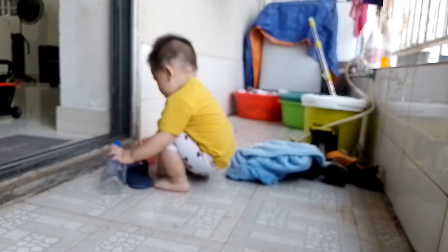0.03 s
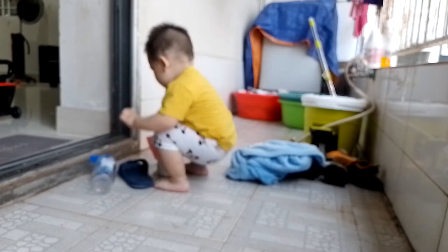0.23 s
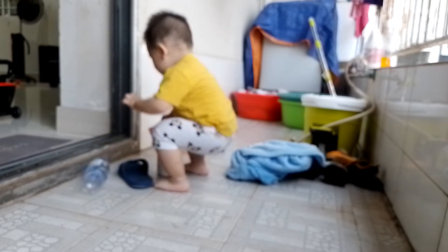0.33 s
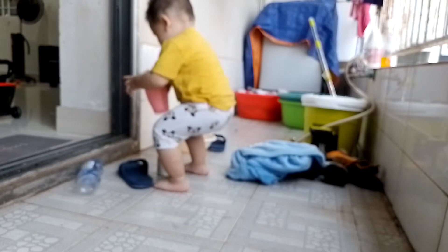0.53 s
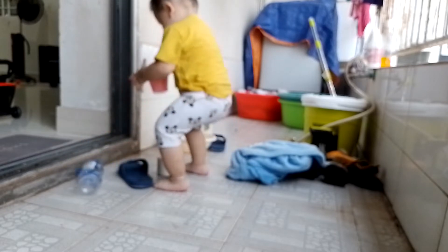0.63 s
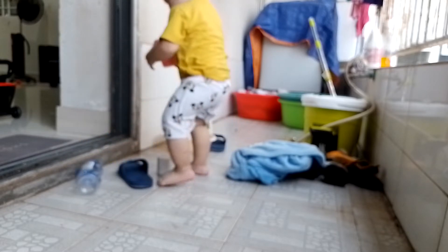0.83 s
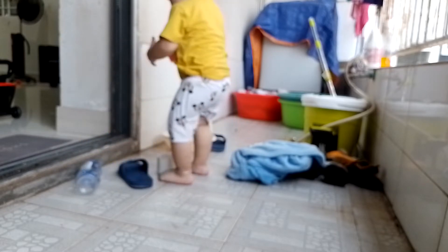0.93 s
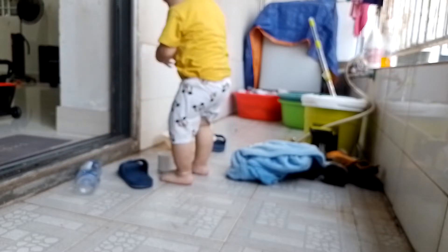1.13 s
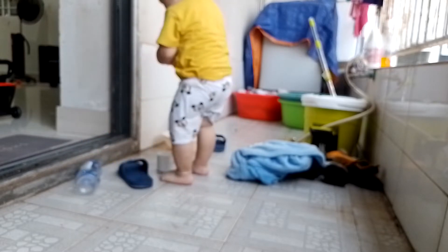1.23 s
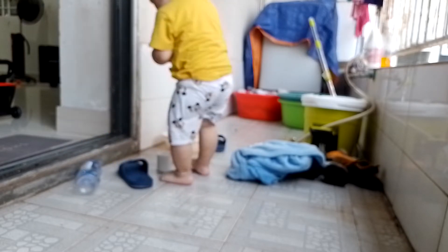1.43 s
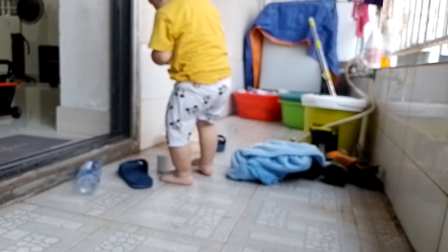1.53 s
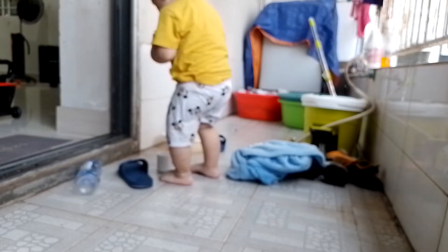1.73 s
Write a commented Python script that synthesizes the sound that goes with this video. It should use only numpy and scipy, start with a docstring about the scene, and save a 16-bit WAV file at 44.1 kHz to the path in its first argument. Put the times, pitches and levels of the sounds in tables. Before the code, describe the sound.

An empty thin plastic bottle topples onto balcony tiles, bouncing in a fast run of bright crackling knocks with a hollow ring, then rolls, scuffs softly and stops; close stereo pickup, faint outdoor noise beneath.

```python
"""Empty bottle on a tiled balcony

A plastic bottle topples, bounces from end to end, rattles and rolls to rest between hard walls.
Each contact is a click, snaps, noise and ringing shell modes; a sine is the hollow note of the air inside.
Filtered noise makes the low rumble, the roll and the scuffs; gliding and dying sines, the squeal and last knocks.
Faint distant outdoor noise lies underneath; two microphone ports each add their own treble resonance."""
import sys
import numpy as np
from scipy import signal
from scipy.fft import rfft, irfft
from scipy.io import wavfile
from scipy.ndimage import uniform_filter1d

SR = 44100
rng = np.random.default_rng(int(sys.argv[2]) if len(sys.argv) > 2 else 0)


def store_wav(level_fs):
    """Save 16-bit WAV to argv[1]."""
    pcm = np.round(np.clip(np.atleast_2d(level_fs), -1, 1) * 32767)
    wavfile.write(sys.argv[1], SR, pcm.T.astype(np.int16))


N = 79380

# steady noise from beyond the balcony, relative spectrum: (frequency [Hz], density [dB per Hz])
OUTDOOR_SPECTRUM = [(15, -29), (28, -8), (80, -4), (125, -14), (160, -22.5), (230, -7.5), (360, -1.5),
                    (440, -2), (490, 8), (580, -5.5), (870, -4), (1250, -13), (2000, -11.5), (4500, -20),
                    (9000, -22), (14000, -17.5)]
# likeness of the two channels in that noise: (frequency [Hz], likeness [0-1])
OUTDOOR_LIKENESS = [(60, 1), (290, .76), (640, 0.2), (1400, 0)]
# contacts with the tiles: (time [s], crack level [dB], brightness [dB per octave], lingering ring [dB],
# shell modes [dB], hollow note [dB])
CONTACTS = [(0.2034, -6.5, 0, -4, 5, -35.5), (0.2720, -4, 0.4, -6, 3, -33.5),
            (0.3320, -0.5, 0.5, -8, 6.5, -23), (0.3403, 7, 3.5, -6.5, 1, -67),
            (0.3466, -14.5, -2.5, -14, -11, -39), (0.4265, 4, 1.6, -3.5, 0, -37),
            (0.4390, 4, -1.5, -3.5, -5, -29), (0.5100, 2.5, -1, -0.5, -8, -30.5),
            (0.5680, -5.5, -2, -8.5, 1, -34), (0.6056, -4.5, -1.5, -9.5, -6.5, -32),
            (0.663, -9.5, -1.5, -12, -1, -35), (0.6792, -13.5, -3, -4.5, -10, -29.5),
            (0.6950, -10.5, -1.5, -7, 2, -43.5), (0.7343, -18, -3, -34, -1, -35.5),
            (0.7505, -14.5, -3, -33, -5, -41.5), (0.77, -22.5, -3, -32, 14.5, -47),
            (0.7903, -22, -4, -37, -7, -77)]
# colour of every contact: (frequency [Hz], gain [dB])
SHELL_SPECTRUM = [(30, -56), (70, -36.5), (160, -39), (290, -5), (420, 1.5), (620, -12.5), (1000, -13.5),
                  (1550, -8.5), (1900, -7), (2400, -6.5), (4000, -7), (5500, -3), (9000, -4), (14000, -4.5)]
# ringing modes of the thin shell: (nominal frequency [Hz], level [dB], t60 [s])
SHELL_MODES = [(792, -44.5, 0.084), (1182, -44.5, .15), (1465, -43, 0.24), (1604, -34.5, 0.15),
               (2289, -37.5, .12), (3080, -35, 0.17), (3470, -38.5, .14), (5290, -47, .12),
               (6690, -35.5, 0.063), (7650, -58.5, 0.13)]
# lingering sound of the balcony: (frequency [Hz], gain [dB], t60 [s])
BALCONY_TAIL = [(80, 19, 2.1), (170, 11.5, 1.7), (354, 5, 0.61), (694, 3.5, 1), (1474, 2, 0.67),
                (3000, 4, 0.62), (7000, -5, 0.79), (11180, -7.5, 0.88), (14000, -22.5, 0.33)]
# stereo width of the bounces: (frequency [Hz], gain of the side signal [dB])
BOUNCE_WIDTH = [(100, -9.5), (300, -9.5), (600, -0.5), (1200, 2), (5000, -0.5)]
# low rumble while the bottle tumbles: (time [s], level [dB])
RUMBLE_LEVEL = [(0.38, -97), (0.45, -69.5), (0.62, -68), (0.8, -71.5), (0.95, -79), (1.1, -96)]
# faint scuffs on the tiles: (time [s], length [s], level [dB])
SCUFF_EVENTS = [(0.873, 0.13, -60), (0.95, .17, -62.5)]
# soft last knocks as the bottle settles: (time [s], level [dB])
LAST_KNOCKS = [(0.896, -53), (1.025, -54)]
# response of the left microphone port: (frequency [Hz], gain [dB])
LEFT_PORT_RESPONSE = [(100, 4), (400, 2), (1100, 0.5), (2500, 1.5), (5800, 4.5), (6800, 9), (7350, 17),
                      (8000, 10.5), (8600, 3), (9500, 0), (10500, -14.5), (11300, -8.5), (12300, -12),
                      (14000, -11)]
# response of the right microphone port: (frequency [Hz], gain [dB])
RIGHT_PORT_RESPONSE = [(100, 3), (400, -2), (1100, 2.5), (2500, 1.5), (5800, 1), (9000, 1), (10000, 5.5),
                       (10800, 11.5), (11500, 8), (12200, -0.5), (14000, -7.5)]

# All levels are those ahead of the microphone ports.
OUTDOORS_DB = -61.5
CLICK_DB, CLICK_GROWTH = -11.5, 0.38  # hard blows click more: extra dB per dB of crack
SNAP_COUNT, SNAP_SPAN_S, SNAP_DB = 5, 0.0055, -8.5  # the wall buckles in a few quick snaps
MODE_DETUNE = 0.015  # largest relative shift of a mode as the thin wall flexes from blow to blow
RIB_COUNT, RIB_LOW_HZ, RIB_HIGH_HZ = 120, 998.4, 12544  # fine modes of the ribbed wall
RIB_T60_S, RIB_DB, RIB_SPREAD_DB = 0.13, -4.5, 3
BUZZ_RISE_S, BUZZ_T60_S, BUZZ_DB = 0.0045, 0.033, 1
WALLS_RISE_S, WALLS_T60_S, WALLS_DB = 0.0069, 0.48, -12.5
SPOT_RIPPLE_DB, SPOT_WIDTH_HZ = 5, 160  # each spot on the shell has its own colour
AIR_HZ, AIR_T60_S, AIR_RISE_S = 377.2, 0.85, 0.0045
AIR_BEND_HZ, AIR_WAVER_HZ, AIR_FLUTTER = 12, 2.3, 0.039  # flutter is a share of the level
AIR_LEFT_DB, AIR_RIGHT_DB, AIR_ROOM_DB = -2, -4, -24
RUMBLE_LOW_HZ, RUMBLE_HIGH_HZ = 62, 131.8
RUMBLE_WIDTH = 0.8  # separate noise in each channel, relative to the shared noise
ROLL_START_S, ROLL_END_S, ROLL_TICKS_PER_S = 0.65, 0.94, 1700
ROLL_DB, ROLL_FADE_DB_PER_S = -52.5, 69
SQUEAL_S, SQUEAL_LENGTH_S, SQUEAL_LEFT_DB, SQUEAL_RIGHT_DB = 0.855, 0.085, -61, -72
SQUEAL_HZ, SQUEAL_GLIDE_HZ, SQUEAL_WIDTH_HZ = 7290, 150, 45  # width is the rms wander
SCUFF_LOW_HZ, SCUFF_TOP_HZ = 6350, 10260
SETTLE_HZ, SETTLE_T60_S, SETTLE_RISE_S = 340, 0.18, 0.0066
EDGE_HZ = 14350  # upper band limit


def amp(db):
    """Decibels to gain."""
    return 10 ** (np.asarray(db) / 20)


def unit(x):
    """Scales to an rms of one."""
    return x / np.sqrt(np.mean(x ** 2) + 1e-20)


def read(points, hz, axis=1):
    """Reads one column of a table on a log-frequency axis."""
    table = np.array(points, float)
    return np.interp(np.log(hz + 1), np.log(table[:, 0] + 1), table[:, axis])


def add(mix, s, sound):
    """Adds a stereo sound at time s."""
    part = mix[:, round(s * SR):][:, :sound.shape[1]]
    part += sound[:, :part.shape[1]]


def colour(x, curve, size=4096):
    """Causal minimum-phase filter whose gain in dB is curve(hz)."""
    log_gain = np.log(amp(curve(abs(np.fft.fftfreq(size, 1 / SR)))))
    spectrum = np.exp(np.conj(signal.hilbert(log_gain)))
    taps = np.fft.ifft(spectrum).real[:size // 2]
    taps = taps.reshape((1,) * (x.ndim - 1) + (-1,))
    return signal.fftconvolve(x, taps, axes=-1)[..., :x.shape[-1]]


def drift(shape, size):
    """Smooth random wander of rms one along the last axis."""
    once = uniform_filter1d(rng.standard_normal(shape), size=size)
    return unit(uniform_filter1d(once, size=size))


def outdoors(size=1024):
    """Steady distant noise with soft drifting patches, near mono in the bass."""
    hz = np.fft.rfftfreq(size, 1 / SR)
    frames = N // (size // 4) + 5
    a, b, c, d, patches = rng.standard_normal((frames, len(hz), 5)).T
    patches = uniform_filter1d(patches, size=14, axis=0)  # smooth over frequency
    patches = unit(uniform_filter1d(patches, size=16, axis=1))  # and over time
    same = read(OUTDOOR_LIKENESS, hz)[:, None]
    left = a + 1j * b
    right = same * left + np.sqrt(1 - same ** 2) * (c + 1j * d)
    z = np.array([left, right]) * amp(1.6 * patches)
    noise = signal.istft(z, nperseg=size, noverlap=size - size // 4)[1][:, :N]
    gain = amp(read(OUTDOOR_SPECTRUM, np.fft.rfftfreq(N, 1 / SR)))
    return amp(OUTDOORS_DB) * unit(irfft(rfft(noise) * gain, N))


def burst(t, rise_s, t60):
    """Stereo cloud of dense echoes that swells and dies, of energy one per channel."""
    cloud = rng.standard_normal((2, len(t))) * (1 - np.exp(-t / rise_s)) * amp(-60 * t / t60)
    return cloud / np.linalg.norm(cloud, axis=1, keepdims=True)


def room_tail(size=256):
    """Diffuse tail of the balcony, each band dying at its own speed, cut at one second."""
    hz, t, z = signal.stft(rng.standard_normal((2, SR)), SR, nperseg=size)
    decay = amp(-60 * t / read(BALCONY_TAIL, hz, axis=2)[:, None])
    tail = signal.istft(z * decay, SR, nperseg=size)[1][:, :SR]
    tail *= 1 - np.exp(-np.arange(SR) / SR / 0.021)  # gradual onset
    return colour(tail / np.linalg.norm(tail[0]), lambda hz: read(BALCONY_TAIL, hz))


def wall_snaps(t, crack_db):
    """The buckling wall: one click in both channels, then scattered snaps of either sign."""
    snaps = np.zeros((2, len(t)))
    snaps[:, round(0.0005 * SR)] = amp(CLICK_DB + CLICK_GROWTH * crack_db)
    for side in snaps:
        at = (np.arange(SNAP_COUNT) + rng.random(SNAP_COUNT)) * SNAP_SPAN_S / SNAP_COUNT
        side[(at * SR).astype(int)] += amp(SNAP_DB) * rng.choice([-1, 1], SNAP_COUNT)
    return snaps


def shell_ring(t):
    """The shell's main modes as dying sines, slightly detuned, with separate phases per channel."""
    ring = np.zeros((2, len(t)))
    for hz, db, t60 in SHELL_MODES:
        shifted_hz = hz * (1 + MODE_DETUNE * rng.uniform(-1, 1))
        wave = np.sin(2 * np.pi * (shifted_hz * t + rng.random((2, 1))))
        ring += amp(db - 60 * t / t60) * wave
    return ring


def rib_ring(t, rib_hz):
    """The many fine modes of the wall, each struck with a random strength; energy one per channel."""
    strength = amp(RIB_SPREAD_DB * rng.standard_normal((RIB_COUNT, 1)))
    phase = rng.random((2, RIB_COUNT))
    waves = strength * np.exp(2j * np.pi * rib_hz[:, None] * t)
    ring = (np.exp(2j * np.pi * phase) @ waves).real * amp(-60 * t / RIB_T60_S)
    return ring / np.linalg.norm(ring, axis=1, keepdims=True)


def contact(crack_db, tilt_db, ring_db, modes_db, rib_hz):
    """A click and snaps, the buzz and modes of the shell, near walls and the long tail."""
    t = np.arange(SR // 5) / SR
    shell = wall_snaps(t, crack_db) + amp(modes_db) * shell_ring(t)
    shell += amp(RIB_DB) * rib_ring(t, rib_hz)
    shell += amp(BUZZ_DB) * burst(t, BUZZ_RISE_S, BUZZ_T60_S)
    walls = amp(WALLS_DB) * burst(t, WALLS_RISE_S, WALLS_T60_S)
    sound = amp(ring_db) * room_tail()
    add(sound, 0, amp(crack_db) * (shell + walls))
    spot_hz = np.arange(128) * SPOT_WIDTH_HZ
    spot_db = SPOT_RIPPLE_DB * rng.standard_normal(len(spot_hz)) * np.minimum(spot_hz / 2000, 1)

    def curve(hz):
        """Shell colour, ripple of the struck spot and brightness tilt about 5 kHz."""
        tilt = tilt_db * np.log2(np.clip(hz, 1200, 14000) / 5000)
        return read(SHELL_SPECTRUM, hz) + np.interp(hz, spot_hz, spot_db) + tilt

    return colour(sound, curve)


def bounces():
    """All contacts of the shell with the floor, narrowed in the bass."""
    out = np.zeros((2, N))
    place = (np.arange(RIB_COUNT) + rng.random(RIB_COUNT)) / RIB_COUNT
    rib_hz = RIB_LOW_HZ + (RIB_HIGH_HZ - RIB_LOW_HZ) * place ** 1.3
    for s, crack_db, tilt_db, ring_db, modes_db, _ in CONTACTS:
        add(out, s, contact(crack_db, tilt_db, ring_db, modes_db, rib_hz))
    mid = out.mean(0)
    side = colour((out[0] - out[1]) / 2, lambda hz: read(BOUNCE_WIDTH, hz))
    return np.array([mid + side, mid - side])


def hollow_note():
    """The air in the bottle: every contact resets its ring and bends the pitch up for a moment."""
    t = np.arange(N) / SR
    level, bend = np.zeros(N), np.zeros(N)
    for s, *_, note_db in CONTACTS:
        age = t[t >= s] - s
        level[t >= s] = amp(note_db - 60 * age / AIR_T60_S)
        bend[t >= s] = np.exp(-age / 0.013)
    keep = np.exp(-1 / (AIR_RISE_S * SR))
    smooth_level = signal.lfilter([1 - keep], [1, -keep], level)
    hz = AIR_HZ + AIR_BEND_HZ * bend + AIR_WAVER_HZ * drift(N, size=500)
    flutter = 1 + AIR_FLUTTER * drift(N, size=400)
    note = smooth_level * flutter * np.sin(2 * np.pi * np.cumsum(hz) / SR)
    echo = signal.fftconvolve(note[None], room_tail(), axes=1)[:, :N]
    return note * amp([[AIR_LEFT_DB], [AIR_RIGHT_DB]]) + amp(AIR_ROOM_DB) * echo


def rumble():
    """Low rumble of the tumbling bottle on the floor: band-passed noise under a level curve."""
    band = signal.butter(2, [RUMBLE_LOW_HZ, RUMBLE_HIGH_HZ], "bandpass", fs=SR, output="sos")
    noise = rng.standard_normal(N) + RUMBLE_WIDTH * rng.standard_normal((2, N))
    level = amp(np.interp(np.arange(N) / SR, *np.transpose(RUMBLE_LEVEL)))
    return unit(signal.sosfilt(band, noise)) * amp([[1.5], [-3.5]]) * level  # stronger on the left


def roll():
    """The ribs tick over the tiles at random moments, ever more softly until the bottle stops."""
    t = np.arange(N) / SR
    struck = rng.random(N) < ROLL_TICKS_PER_S / SR
    ticks = unit(rng.standard_normal((2, N)) * struck)
    stop = np.clip((ROLL_END_S - t) / 0.066, 0, 1)
    fade = amp(ROLL_DB - ROLL_FADE_DB_PER_S * np.maximum(t - ROLL_START_S, 0))
    ticks *= (t > ROLL_START_S) * stop * fade
    buzz = burst(t[:SR // 4], BUZZ_RISE_S, BUZZ_T60_S)
    rung = signal.fftconvolve(ticks, buzz, axes=1)[:, :N]
    return colour(rung, lambda hz: read(SHELL_SPECTRUM, hz))


def squeal():
    """A thin, slightly rising, wavering whistle, mostly on the left, as the bottle slides."""
    u = np.arange(0, 1, 1 / (SQUEAL_LENGTH_S * SR))
    wander = unit(uniform_filter1d(rng.standard_normal(len(u)), size=100))
    hz = SQUEAL_HZ + SQUEAL_GLIDE_HZ * u ** 2 + SQUEAL_WIDTH_HZ * wander
    whistle = np.sqrt(np.sin(np.pi * u)) * np.sin(2 * np.pi * np.cumsum(hz) / SR)
    out = np.zeros((2, N))
    add(out, SQUEAL_S, amp([[SQUEAL_LEFT_DB], [SQUEAL_RIGHT_DB]]) * whistle)
    return out


def scuffs():
    """Soft, grainy high rustles on the tiles: treble noise with a flickering level."""
    out = np.zeros((2, N))
    treble = signal.butter(2, [SCUFF_LOW_HZ, SCUFF_TOP_HZ], "bandpass", fs=SR, output="sos")
    for s, length, db in SCUFF_EVENTS:
        u = np.arange(0, 1, 1 / (length * SR))
        noise = signal.sosfilt(treble, rng.standard_normal((2, len(u))))
        grit = unit(noise * amp(2.8 * drift(len(u), size=120)))
        add(out, s, amp([[db], [db - 5]]) * np.sin(np.pi * u) * grit)
    return out


def settle():
    """Dull low knocks, each a dying sine, as the bottle comes to rest."""
    t = np.arange(SR // 4) / SR
    out = np.zeros((2, N))
    knock = np.minimum(t / SETTLE_RISE_S, 1) * np.sin(2 * np.pi * SETTLE_HZ * t)
    for s, db in LAST_KNOCKS:
        add(out, s, amp(db - 60 * t / SETTLE_T60_S) * knock * amp([[0], [-3]]))
    return out


def scene():
    """The bottle on the balcony over the distant outdoor noise."""
    bottle = bounces() + hollow_note() + rumble() + roll() + squeal() + scuffs() + settle()
    return outdoors() + bottle


def record(dry):
    """Each microphone port adds its own resonance; then a low-pass sets the band limit."""
    left = colour(dry[0], lambda hz: read(LEFT_PORT_RESPONSE, hz))
    right = colour(dry[1], lambda hz: read(RIGHT_PORT_RESPONSE, hz))
    low_pass = signal.firwin(255, EDGE_HZ, window=("kaiser", 9), fs=SR)
    return signal.oaconvolve(np.array([left, right]), low_pass[None], "same")


dry = scene()
out = record(dry)
store_wav(out)
```